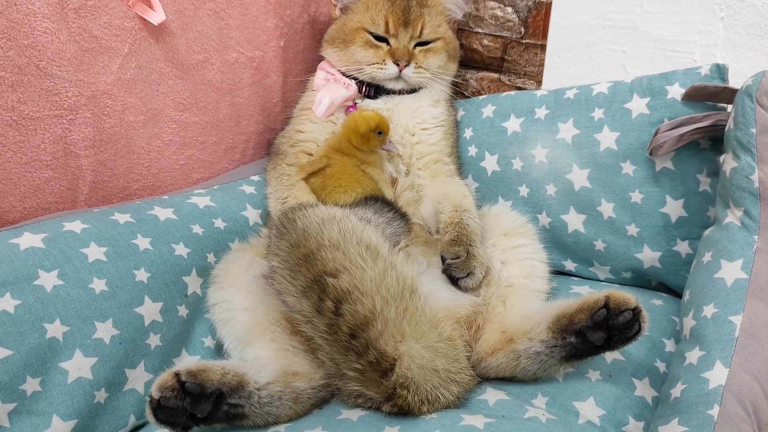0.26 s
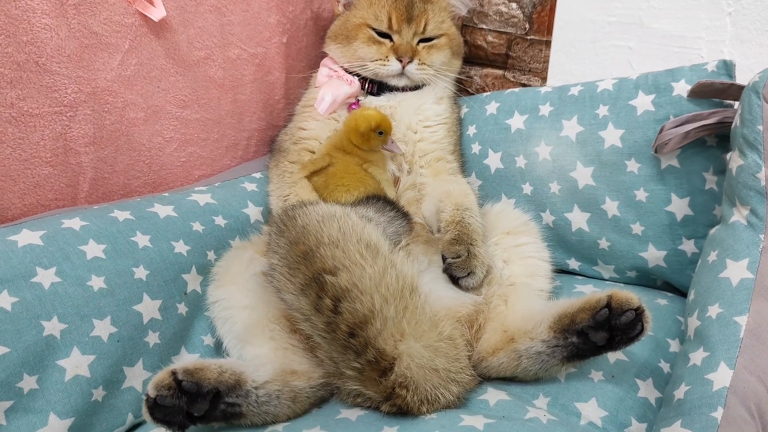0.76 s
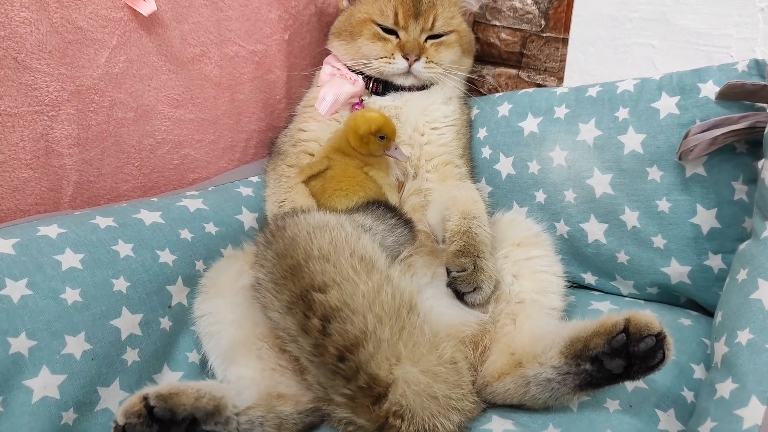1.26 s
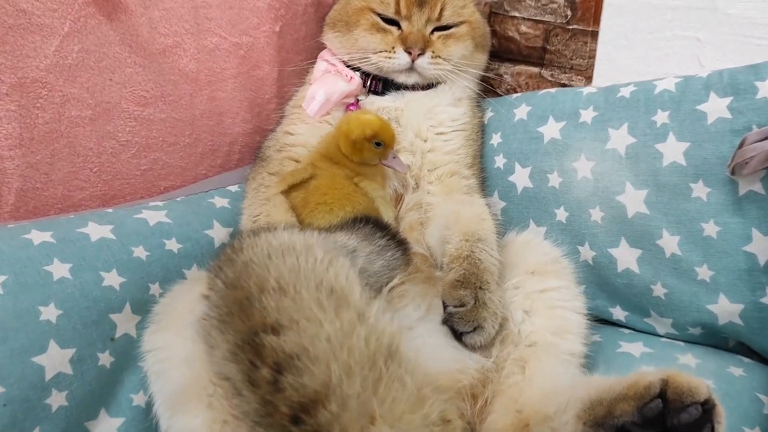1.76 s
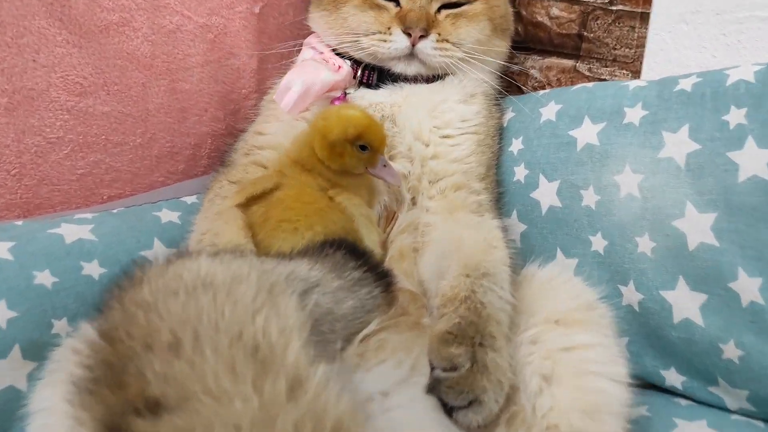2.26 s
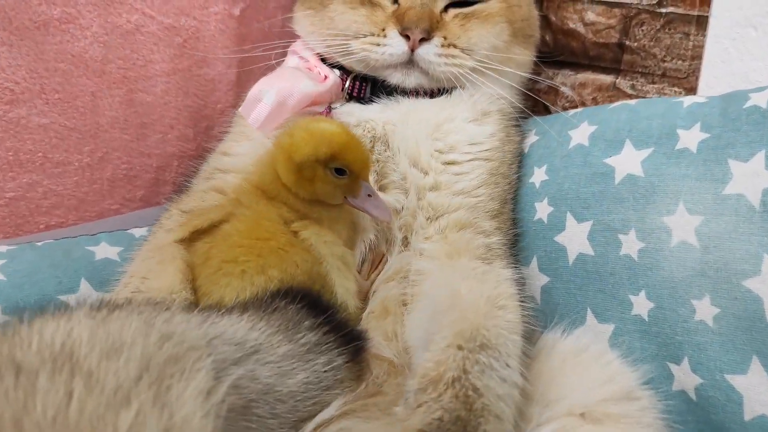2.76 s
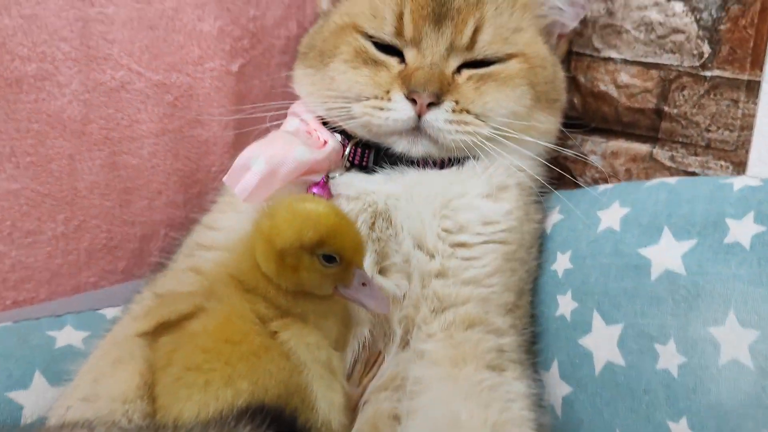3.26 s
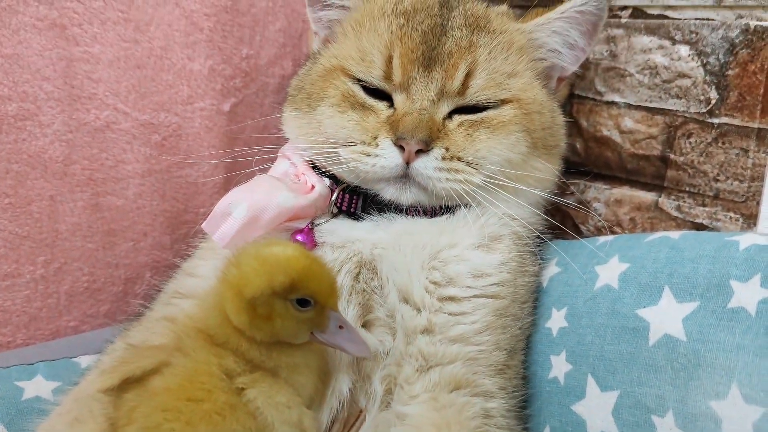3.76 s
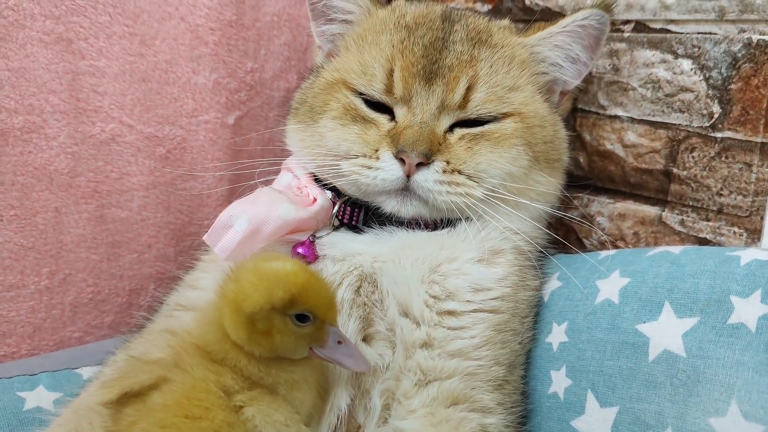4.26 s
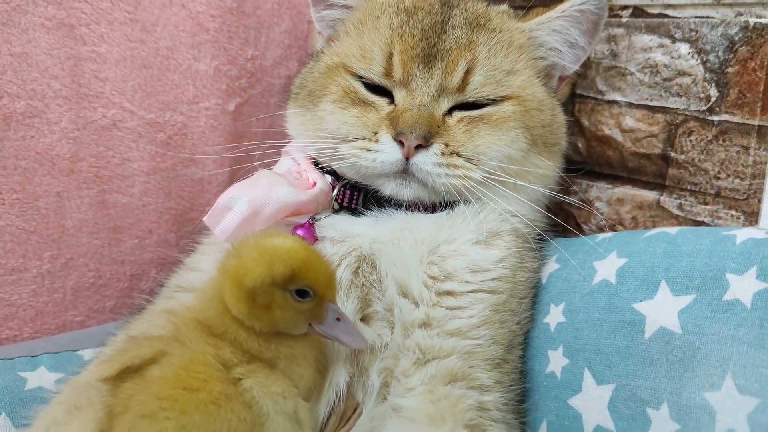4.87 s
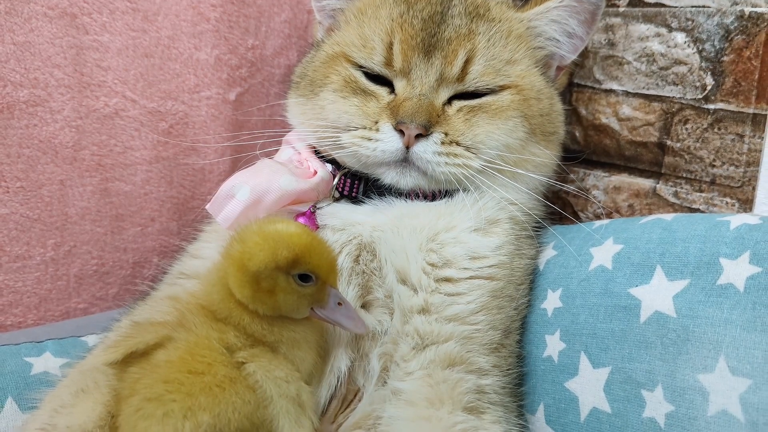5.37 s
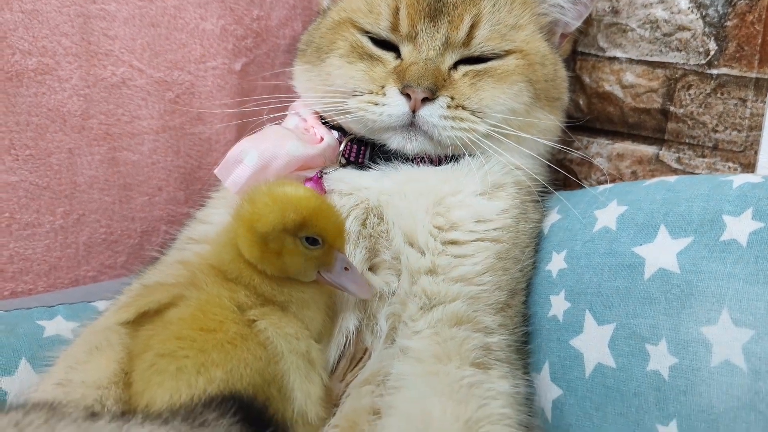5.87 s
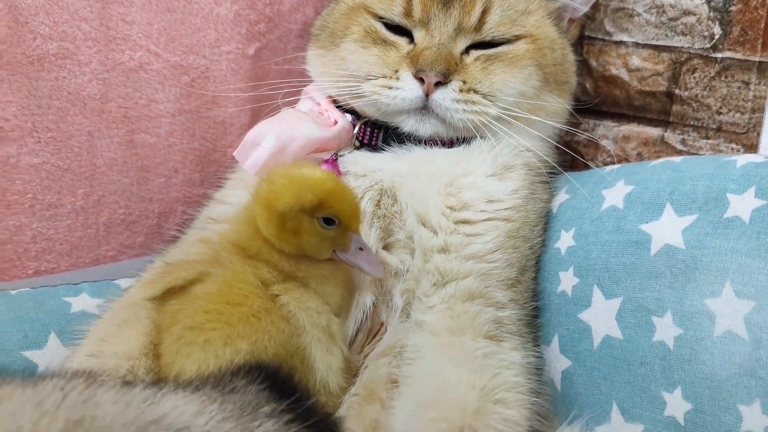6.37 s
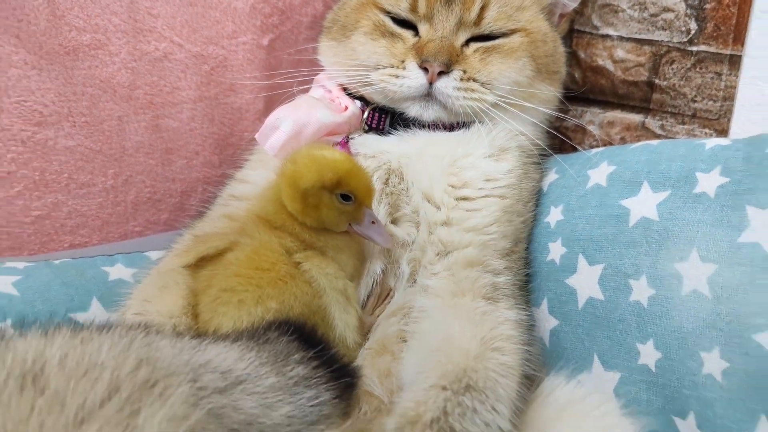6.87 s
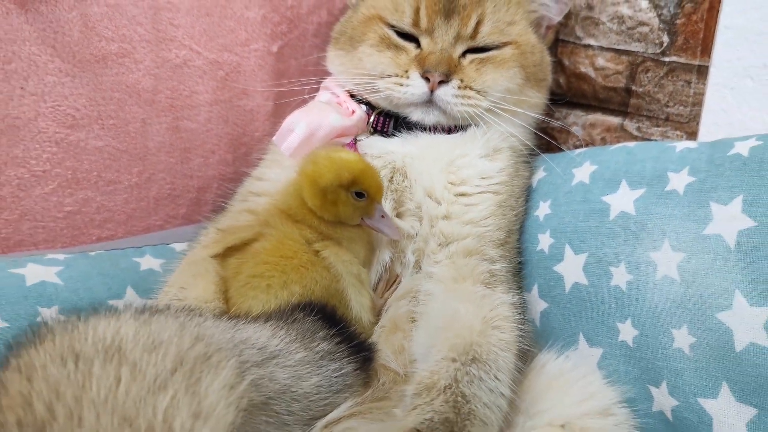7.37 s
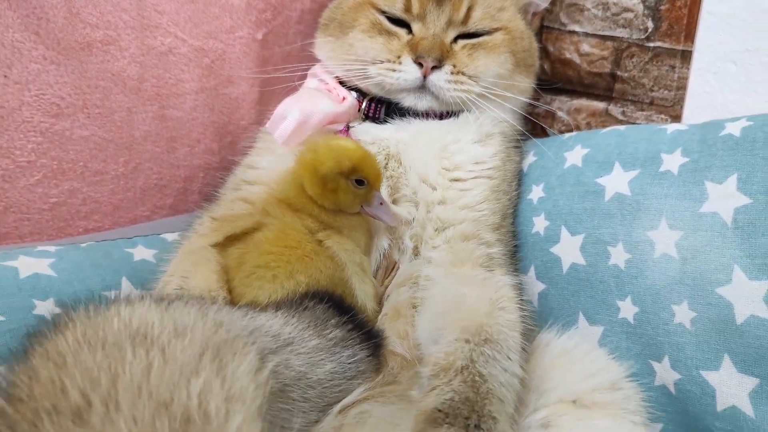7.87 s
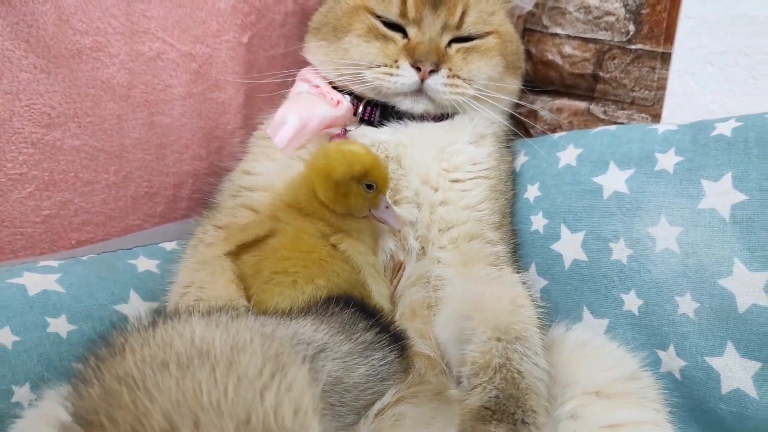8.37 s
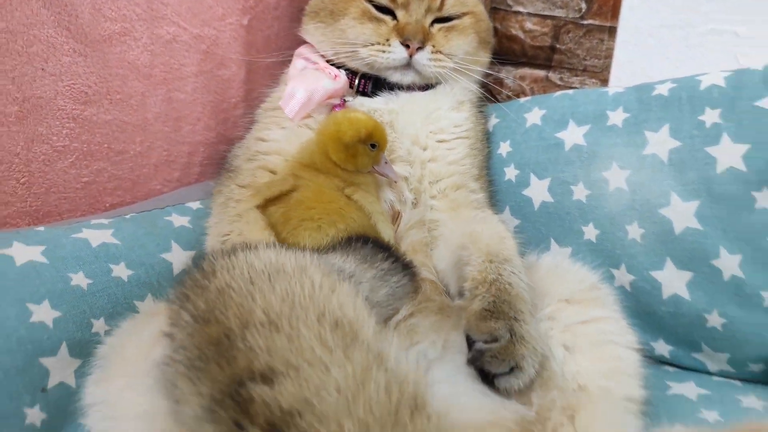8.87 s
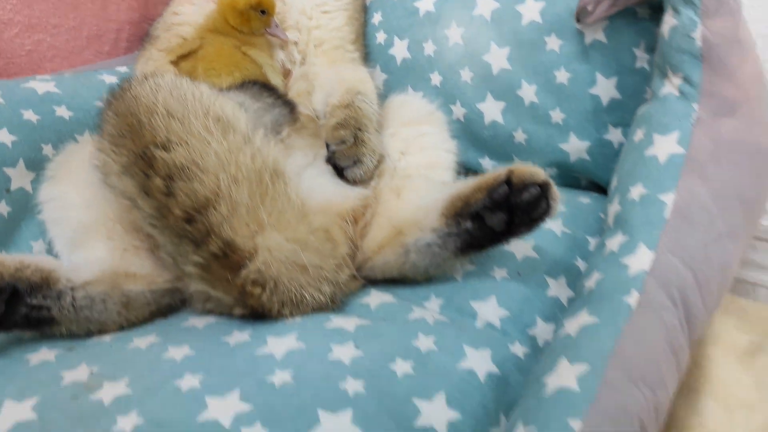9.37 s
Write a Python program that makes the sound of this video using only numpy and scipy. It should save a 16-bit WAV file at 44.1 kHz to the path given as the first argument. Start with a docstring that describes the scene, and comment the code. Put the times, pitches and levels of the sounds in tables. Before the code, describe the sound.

A single duckling peeps close to a hand-held stereo microphone in a quiet room, about four peeps a second throughout. Each is a tenth of a second long, a high arched whistle falling in pitch, raspy at first and clearer at the end. The peeps soften before the middle, grow loudest around seven seconds, then sink again. Two dull soft bumps occur early; faint rumble and hiss lie beneath.

```python
"""In a quiet room, a duckling rests on a cushion near a hand-held microphone pair, peeping about four times a second.
Each peep is an arched, falling whistle from one side of the syrinx; the other side adds a weaker, higher whistle,
and the first half of the peep breaks into a rasp: frequency-modulated sines with shaped noise.
The peeps swell and sink as the microphones move in and back. Decaying modes make soft bumps, noise makes
the background and the echoes, and a gliding sine makes a faint far tone."""
import sys
import numpy as np
from scipy import signal
from scipy.fft import rfft, irfft, next_fast_len
from scipy.io import wavfile
from scipy.ndimage import map_coordinates

SR = 44100
rng = np.random.default_rng(int(sys.argv[2]) if len(sys.argv) > 2 else 0)


def generate_wav(sig):
    """Save sig (samples, or channels by samples) to the path in sys.argv[1] as 16-bit PCM at SR."""
    pcm = np.round(np.clip(np.atleast_2d(sig).T, -1, 1) * 32767).astype(np.int16)
    wavfile.write(sys.argv[1], SR, pcm)


N = 424671


def from_db(db):
    """Amplitude gain is the level's antilogarithm: 20 dB for a factor of ten."""
    return 10 ** (np.asarray(db) / 20)


def rms_one(x):
    """Normalise the effective value: scale to an rms of 1."""
    return x / np.sqrt(np.mean(x ** 2) + 1e-20)


def in_time(rows):
    """Linear interpolation: each column of a timed table at every sample."""
    knots_s, *columns = np.transpose(rows)
    t = np.arange(N) / SR
    return [np.interp(t, knots_s, column) for column in columns]


def coloured(x, points):
    """Linear filtering: multiply the spectrum by a response given as (f/Hz, level/dB), smooth in log frequency."""
    size = next_fast_len(x.shape[-1] + 2048)
    hz, db = np.transpose(points)
    bins_hz = np.maximum(np.fft.rfftfreq(size, 1 / SR), 1)
    response = from_db(np.interp(np.log(bins_hz), np.log(hz), db))
    return irfft(rfft(x, size) * response, size)[..., :x.shape[-1]]


def waver(rate_hz):
    """Band-limited random motion: low-passed noise with an rms of 1."""
    low_pass = signal.butter(2, rate_hz, fs=SR, output="sos")
    return rms_one(signal.sosfilt(low_pass, rng.standard_normal(N)))


def background(level_db=-60.5, side_db=-4):
    """Partial coherence: low rumble and faint hiss, a shared noise plus one of opposite sign at the two microphones."""
    # noise spectrum, relative: f/Hz, level/dB per Hz
    noise_spectrum = [(15, -28), (30, -2.5), (58, 2), (135, 2), (230, -4.5), (380, -11.5), (700, -13),
                      (1500, -21), (4000, -23), (6000, -34.5), (8000, -38.5), (9500, -29), (12500, -27),
                      (15000, -30)]
    mid, side = coloured(rng.standard_normal((2, N)), noise_spectrum)
    return from_db(level_db) * rms_one(mid + from_db(side_db) * side * [[1], [-1]])


def envelope_db(t, length, shape):
    """Growth and decay of an oscillation: soft start, swell, hold and release, straight lines in dB."""
    depth_db, begin_s, full_s, release_s, fall_db = shape
    swell_db = np.interp(t, [begin_s, full_s], [-depth_db, 0])
    return swell_db - fall_db * np.maximum(1 - (length - t) / release_s, 0)


def whistle_pitch(t, length, crest_hz, settle_hz):
    """Pitch follows pressure: a hop to the crest, a hold, a sag toward the settling pitch, a collapse as pressure ends."""
    hop_share, hop_s = 0.125, 0.011
    crest_end_s, sag_s = 0.019, 0.027
    collapse_share, collapse_s = 0.41, 0.0088
    lowest_hz = 2226  # the membranes cannot swing more slowly than this
    hop = 1 - hop_share * np.maximum(1 - t / hop_s, 0)
    sag = settle_hz + (crest_hz - settle_hz) * np.exp(-np.maximum(t - crest_end_s, 0) / sag_s)
    collapse = 1 - collapse_share * np.exp((t - length) / collapse_s)
    return np.maximum(hop * sag * collapse, lowest_hz)


def peep_controls():
    """Control of two vocal sources: one rule shapes pitch and strength in every peep, while the voice slowly drifts."""
    # peeps: start t/s, length t/s, crest pitch f/Hz, main whistle level/dB midway between early and late,
    # time into the peep at which the rasp starts to fade t/s
    peeps = [(0.163, 0.094, 3850, -27.5, 0.049), (0.419, 0.096, 3910, -28.5, 0.053),
             (0.693, 0.093, 3830, -29.5, 0.057), (0.976, 0.094, 3850, -30, 0.065),
             (1.263, 0.094, 3730, -29.5, 0.044), (1.56, 0.092, 3710, -29, 0.046),
             (1.851, .094, 3699, -29, 0.053), (2.13, .098, 3703, -29, 0.035),
             (2.401, 0.097, 3750, -31, 0.052), (2.659, 0.093, 3820, -29, 0.059),
             (2.919, 0.097, 3830, -31, 0.07), (3.176, 0.098, 3730, -30, 0.061),
             (3.445, 0.099, 3810, -32.5, 0.071), (3.723, 0.098, 3850, -33.5, 0.068),
             (3.991, 0.097, 3750, -29.5, 0.048), (4.257, 0.097, 3730, -30.5, 0.046),
             (4.528, 0.098, 3770, -29.5, 0.058), (4.794, 0.096, 3840, -28.5, 0.062),
             (5.047, 0.1, 3900, -28, 0.058), (5.3, 0.099, 3960, -27, 0.058),
             (5.555, 0.1, 3990, -26.5, 0.041), (5.808, .1, 3960, -26.5, .04),
             (6.065, 0.098, 4030, -27, 0.047), (6.32, .097, 3970, -26.5, 0.041),
             (6.576, .1, 3880, -25.5, 0.05), (6.833, 0.097, 3830, -24, 0.037),
             (7.102, 0.098, 3746, -24, .036), (7.377, 0.094, 3730, -24, 0.052),
             (7.649, 0.097, 3730, -23.5, 0.037), (7.932, 0.099, 3650, -25.5, .033),
             (8.197, 0.094, 3760, -25.5, 0.046), (8.467, 0.098, 3720, -28, .048),
             (8.746, 0.1, 3680, -29, 0.046), (9.04, .099, 3610, -29, .043), (9.35, 0.095, 3630, -31, 0.051)]
    # drift of the voice: t/s, settling pitch f/Hz, main whistle early minus late level/dB,
    # second whistle early level/dB, second whistle late level/dB, rasp level/dB before the gain in duckling()
    voice_drift = [(0.2, 3125, 1.5, -40.5, -46, -39.5), (1.0, 3247, 0.5, -39, -46.5, -37.5),
                   (1.85, 3230, -1.5, -34, -40.5, -38.5), (2.13, 3094, 5, -42, -43, -40.5),
                   (2.4, 3240, -7, -43, -39, -38), (3.4, 3194, 1, -34.5, -44, -41.5),
                   (4.2, 3126, 0.5, -44.5, -38.5, -43.5), (5.3, 3180, 7.5, -44.5, -36.5, -39),
                   (6.4, 3140, 1.5, -44, -35.5, -40.5), (7.2, 3200, -0.5, -44.5, -37, -38),
                   (8.0, 3234, 0.5, -40.5, -45, -37), (8.7, 3130, -3, -31, -44.5, -38.5),
                   (9.05, 3112, -3.5, -38.5, -37.5, -39.5), (9.35, 3020, -4.5, -39.5, -43.5, -38.5)]
    # envelopes: initial depth level/dB, swell begins t/s, swell ends t/s,
    # release before the end t/s, fall during the release level/dB
    main_shape = (12.9, 0.0045, 0.02415, 0.0056, 14)
    second_shape = (22.7, 0.002, 0.035, 0.021, 11.6)
    rasp_shape = (26.4, 0.0027, 0.0183, 0.023, 18)
    overtone_shape = (11.3, 0.036, 0.058, 0.011, 58)
    undertone_shape = (25, 0.005, 0.028, 0.042, 55)
    early_s, late_s = 0.03, 0.075  # moments of a peep at which "early" and "late" hold
    # the second whistle lies above the main one, widest apart in mid-peep
    second_ratio, widest_s, narrowing_per_s = 1.275, 0.047, 1.2
    ratio_spread = 0.025  # the two sides are tuned a little differently in every peep
    rasp_fade_db_per_s, rasp_fade_db = 762, 19.5  # the rasp dies to a faint remainder
    crack_s, crack_db = 2.13, -35.5  # in one peep the voice cracks and an undertone sounds

    pitch, ratio, gains = np.full(N, 3000.), np.ones(N), np.zeros((5, N))
    drift = np.array(in_time(voice_drift))
    detunes = ratio_spread * rng.standard_normal(len(peeps))
    for (start_s, length, crest_hz, level_db, rasp_s), detune in zip(peeps, detunes):
        at = np.arange(int(start_s * SR), min(int((start_s + length) * SR), N))
        t = (at - at[0]) / SR
        settle_hz, lean_db, second_early_db, second_late_db, rasp_level_db = drift[:, at[0]]
        pitch[at] = whistle_pitch(t, length, crest_hz, settle_hz)
        ratio[at] = second_ratio + detune - narrowing_per_s * np.abs(t - widest_s)

        late = np.interp(t, [early_s, late_s], [0, 1])
        main_db = level_db + lean_db * (.5 - late) + envelope_db(t, length, main_shape)
        second_db = (1 - late) * second_early_db + late * second_late_db
        second_db = second_db + envelope_db(t, length, second_shape)
        cracked = abs(start_s - crack_s) < length
        under_db = envelope_db(t, length, undertone_shape) + (crack_db if cracked else -np.inf)
        rasp_fall_db = np.clip(rasp_fade_db_per_s * (t - rasp_s), 0, rasp_fade_db)
        rasp_db = rasp_level_db + envelope_db(t, length, rasp_shape) - rasp_fall_db
        # overtones bloom in the clear second half
        bloom_db = envelope_db(t, length, overtone_shape)
        fade = np.clip(np.minimum(t, length - t) / .001, 0, 1)
        gains[:, at] = fade * from_db([main_db, second_db, under_db, rasp_db, bloom_db])
    return pitch, ratio, gains


def duckling(jitter=0.0058, rasp_jitter=0.0558, shimmer_db=1.82, second_jitter=0.00918,
             second_shimmer_db=3.0, overtone_shimmer_db=2, overtone_blur=0.42,
             rasp_shimmer_db=6, rasp_db=5, clump_db=3):
    """Two syringeal oscillators: as the membranes rattle, pitch and strength shake and a gritty noise breaks out."""
    # overtones of the main whistle: multiple of its pitch, level/dB
    overtone_levels = [(2, -24), (3, -20), (4, -26)]
    # rasp spectrum, relative: f/Hz, level/dB per Hz
    rasp_spectrum = [(500, -23.5), (850, -15.5), (1550, -12.5), (1950, -2.5), (2300, 11), (2900, -2.5),
                     (3600, -2), (4650, -1), (5400, -17), (6100, -11.5), (7300, -16), (9400, -12),
                     (12200, -15.5), (13600, -14), (15000, -23)]
    pitch, ratio, (main, second, under, rasp, bloom) = peep_controls()
    rough = np.clip(rasp / (main + 0.0014), 0, 1)

    # phase is the running integral of frequency
    main_hz = pitch * (1 + jitter * waver(317) + rasp_jitter * rough * waver(880))
    phase = 2 * np.pi * np.cumsum(main_hz) / SR
    second_hz = pitch * ratio * (1 + second_jitter * waver(315) + rasp_jitter * rough * waver(760))
    upper = 2 * np.pi * np.cumsum(second_hz) / SR

    # no two cycles have quite the same shape, so the overtones are blurred
    overtones = np.zeros(N)
    for multiple, db in overtone_levels:
        strength = from_db(db + overtone_shimmer_db * waver(360))
        overtones += strength * np.sin(round(multiple) * phase + overtone_blur * waver(390))
    main_shimmer = from_db(shimmer_db * waver(85) + rasp_shimmer_db * rough * waver(340))
    whistle = main * (np.sin(phase) + bloom * overtones) * main_shimmer

    # in the cracked peep strong and weak cycles alternate: an undertone an octave below the second whistle
    undertone = under * np.sin(upper / 2 + 0.83 * waver(160))
    second_shimmer = from_db(second_shimmer_db * waver(110) + rasp_shimmer_db * rough * waver(390))
    partner = (second * np.sin(upper) + undertone) * second_shimmer

    # the rasp comes in clumps, separately in its lower and upper bands
    noise = coloured(rng.standard_normal(N), rasp_spectrum)
    low = coloured(noise, [(2700, 1), (3400, -28)])
    low_clumps = low * from_db(clump_db * waver(63))
    high_clumps = (noise - low) * from_db(clump_db * waver(90))
    grit = rms_one(low_clumps + high_clumps)
    return np.sqrt(2) * (whistle + partner) + from_db(rasp_db) * rasp * grit


def echoes(voice, t60, delay_s):
    """Reverberation: convolve with exponentially dying noise, different at each microphone, of unit power gain."""
    t = np.arange(int(1.3 * t60 * SR)) / SR
    reflections = rng.standard_normal((2, N))[:, :len(t)]
    tail = reflections * from_db(-60 * t / t60) * (t > delay_s)
    impulse_response = rms_one(tail) / np.sqrt(len(t))
    return signal.fftconvolve(voice[None], impulse_response, axes=1)[:, :len(voice)]


def microphones(voice):
    """Directivity and path difference: a treble beam and near echoes reach ports of unlike level, delay and colour."""
    # where the beak points: t/s, left minus right level/dB, treble beam level/dB (left gets 0.15 of it),
    # extra level of the very top level/dB
    aim = [(0.2, -5.5, 21, 2), (1.3, -10, 21, -3), (1.6, -5.5, 9.5, 6), (2.2, -5.5, -3.5, 5.5),
           (3.3, -4.5, 5.5, 1), (5.3, -4, 4.5, 3.5), (6.6, -5, 3.5, 0), (8.4, -9, -0.5, -4),
           (8.8, -5, 5.5, 3), (9.2, -4, 20, 5)]
    # delay of the left microphone: t/s, lag/samples
    left_lag = [(0.2, 9), (1.3, 11), (2.1, 7.5), (3, -1.4), (5.7, -1.76), (7.9, 2.5), (8.9, 12)]
    # response of each microphone port: f/Hz, level/dB
    left_port = [(1000, -2), (2200, -12), (3400, 0), (6400, -5.5), (7400, -1), (8200, -34), (9600, -24),
                 (12000, -38.5), (15000, -13)]
    right_port = [(1000, -4.5), (2200, -5), (3400, 0.5), (6400, -3), (7400, -13.5), (8000, -31.5),
                  (8800, -6), (9700, 0), (13000, -6.5), (15000, -35)]
    near_walls_db = -10
    pan_db, beam_db, top_db = in_time(aim)
    lag, = in_time(left_lag)

    heard = voice + from_db(near_walls_db) * echoes(voice, t60=.04, delay_s=.0004)
    very_top = coloured(heard, [(10300, -61), (11800, 2.5)])
    heard = heard + very_top * (from_db(top_db) - 1)
    treble = coloured(heard, [(7600, -81), (8600, -4.5), (10300, -5.0), (12300, -17.5), (15000, -26)])
    left, right = heard + treble * (from_db([.15 * beam_db, beam_db]) - 1)
    left = map_coordinates(left, [np.arange(N) - lag], order=3)

    balance = from_db(pan_db)
    pair = np.array([coloured(balance * left, left_port), coloured(right, right_port)])
    # panning keeps the summed power
    return pair * np.sqrt(2 / (1 + balance ** 2))


def room(voice):
    """Diffuse field: a late tail; the run is already under way, so the room still rings from one earlier peep."""
    # colour of the room's echo: f/Hz, level/dB
    room_colour = [(800, 2), (2300, -7), (3400, -4), (4500, 2), (6500, -0.5), (8000, -18.5), (9700, 4.5),
                   (12500, -4.5), (14500, -24)]
    t60_s, level_db = 0.41, -14
    run = np.concatenate([voice[:int(.27 * SR)], voice])
    return from_db(level_db) * echoes(coloured(run, room_colour), t60_s, delay_s=0.0055)[:, -N:]


def bumps():
    """Modal excitation: an impulse sets quickly damped resonances ringing, a dull knock."""
    # soft bumps: t/s, level/dB
    strikes = [(1.192, -53.5), (2.311, -47.5)]
    # resonances: f/Hz, level/dB, decay by 60 dB t/s
    modes = [(128, -3, 0.059), (192, 2.5, 0.043), (290, 0, 0.032), (479, -5, 0.016), (850, -16, .02),
             (1880, -9, 0.022)]
    blows, t = np.zeros(N), np.arange(int(.2 * SR)) / SR
    for start_s, db in strikes:
        blows[int(start_s * SR)] = from_db(db)
    body = sum(from_db(db - 60 * t / t60) * np.sin(2 * np.pi * hz * t) for hz, db, t60 in modes)
    return signal.fftconvolve(blows, body)[:N]


def far_tone():
    """Frequency modulation: a thin, wavering sine rises and sinks, faint beside the background."""
    # glide: t/s, f/Hz, level/dB
    glide = [(5.68, 469, -110), (5.78, 496.5, -72), (5.88, 521.5, -79), (6.0, 507, -75.5), (6.28, 497, -81),
             (6.42, 483, -110)]
    hz, db = in_time(glide)
    phase = 2 * np.pi * np.cumsum(hz * (1 + .006 * waver(25))) / SR
    return np.sqrt(2) * from_db(db) * np.sin(phase)


def scene():
    """Superposition: the duckling, its room, the bumps, the far tone and the background add."""
    voice = duckling()
    return microphones(voice) + room(voice) + bumps() + far_tone() + background()


def record(dry):
    """Band limitation: a steep elliptic low-pass cuts the top."""
    cutoff_hz = 15200
    low_pass = signal.ellip(10, .1, 80, cutoff_hz, fs=SR, output="sos")
    return signal.sosfilt(low_pass, dry)


dry = scene()
out = record(dry)
generate_wav(out)
```